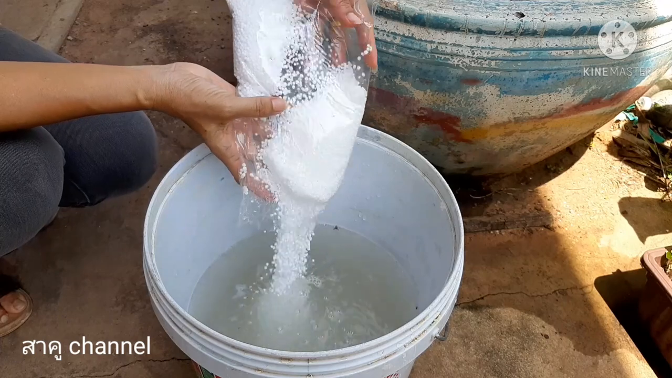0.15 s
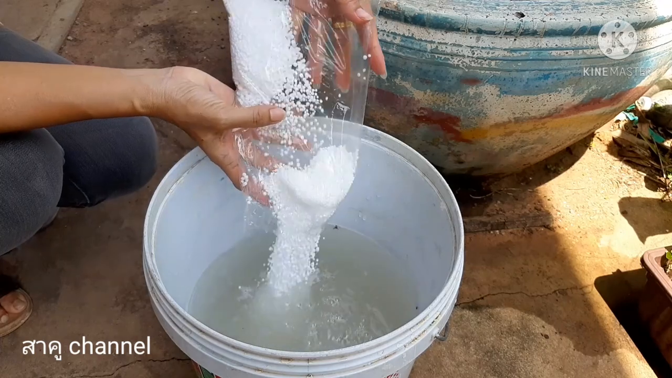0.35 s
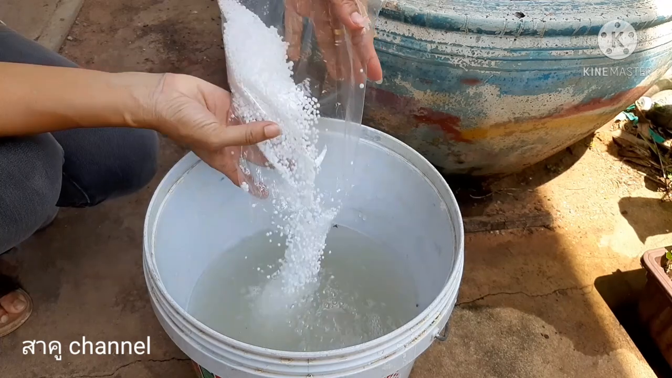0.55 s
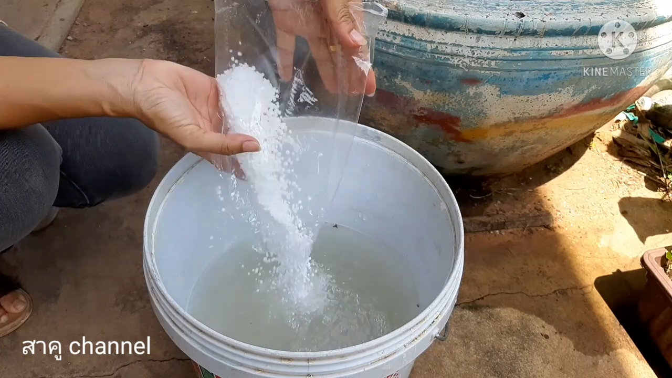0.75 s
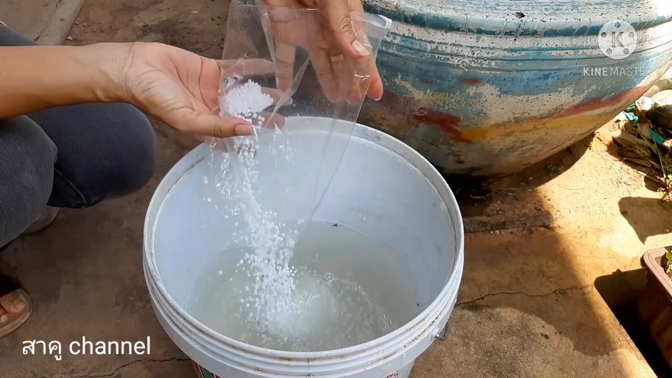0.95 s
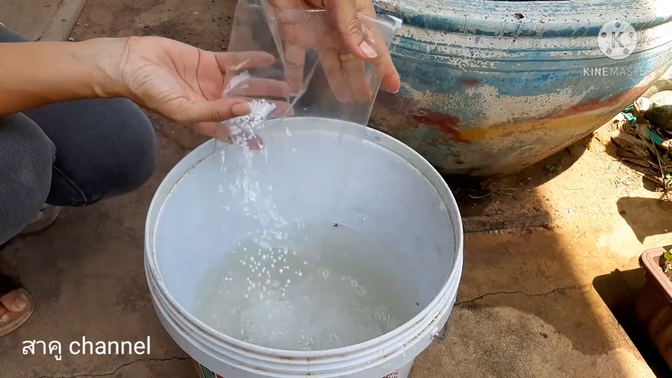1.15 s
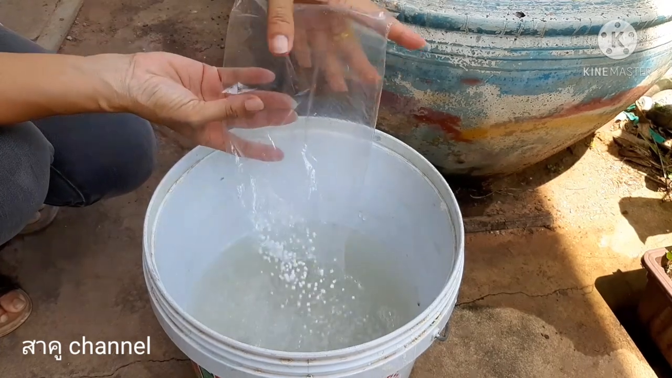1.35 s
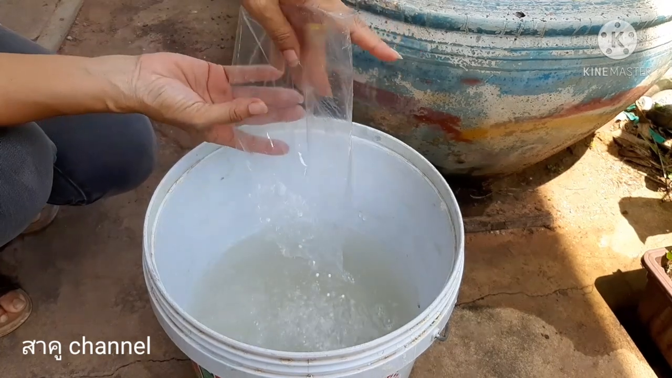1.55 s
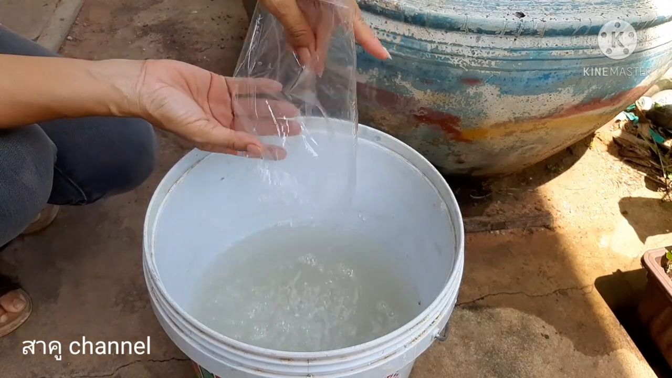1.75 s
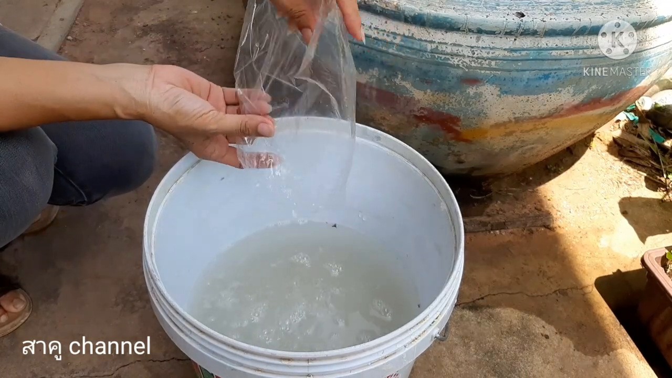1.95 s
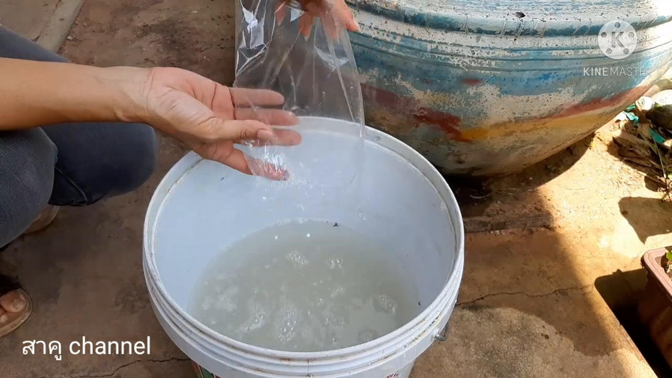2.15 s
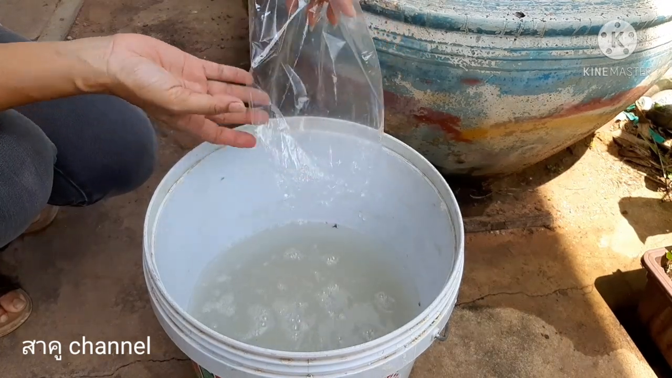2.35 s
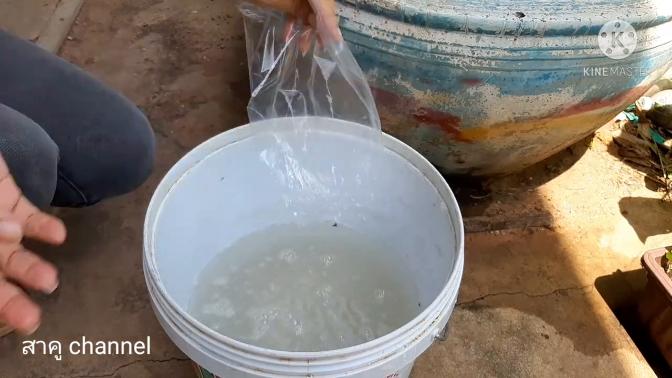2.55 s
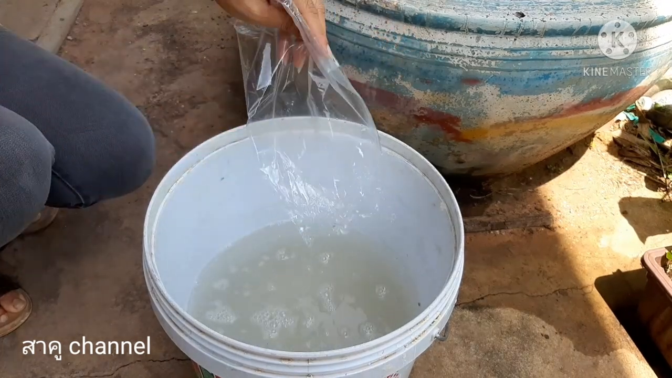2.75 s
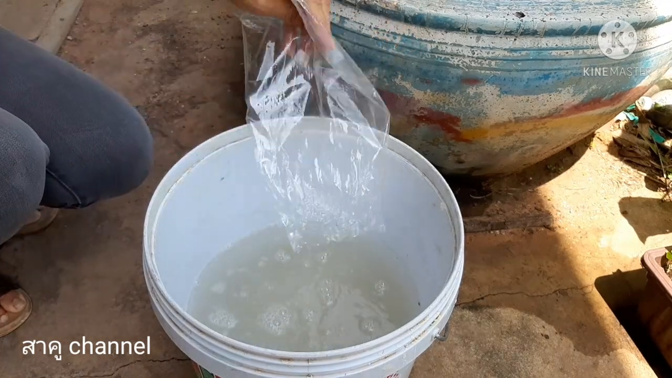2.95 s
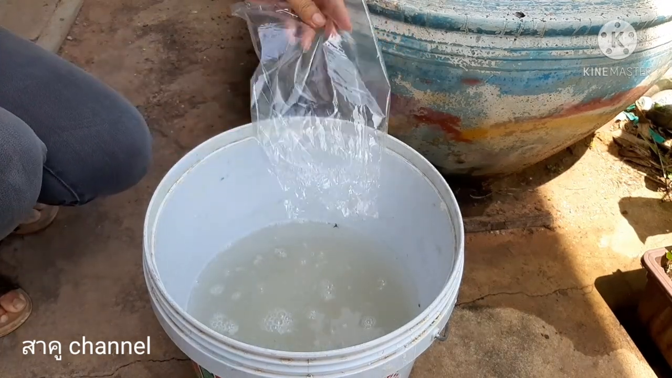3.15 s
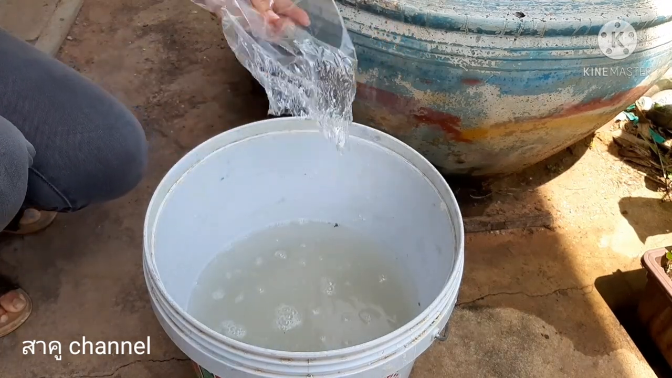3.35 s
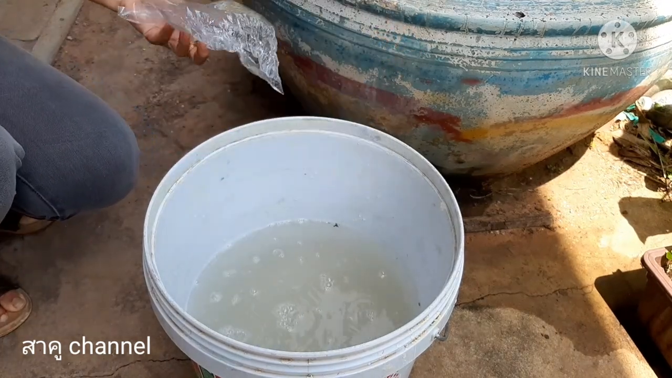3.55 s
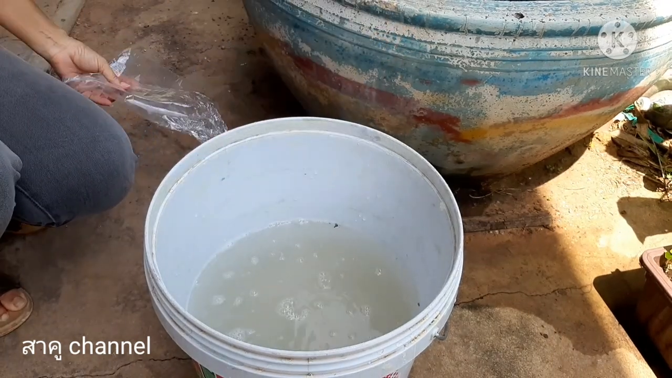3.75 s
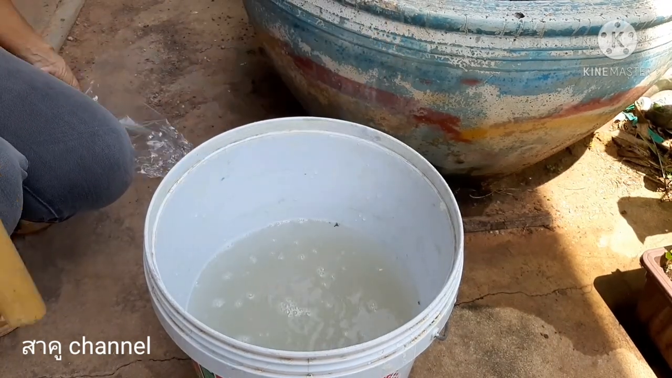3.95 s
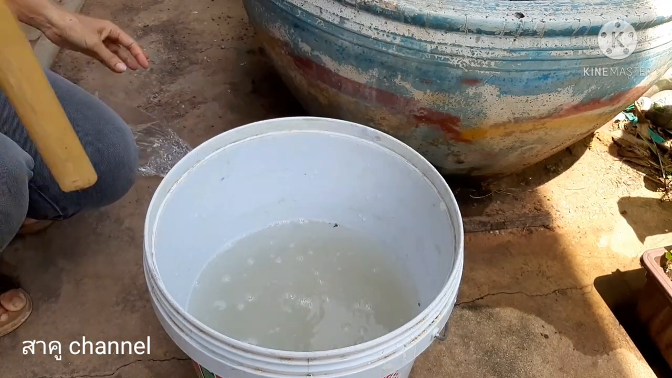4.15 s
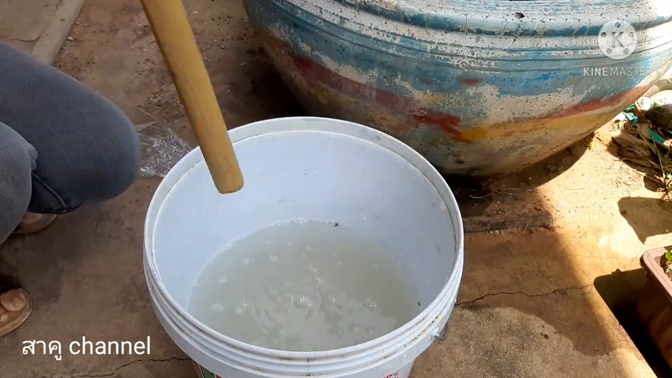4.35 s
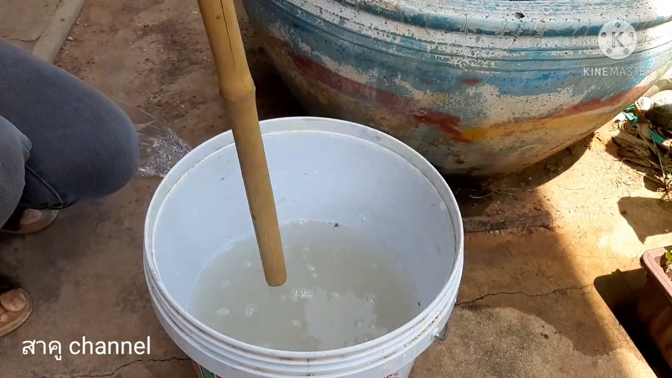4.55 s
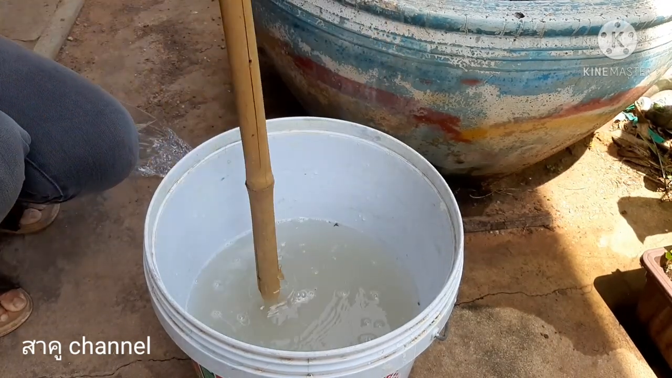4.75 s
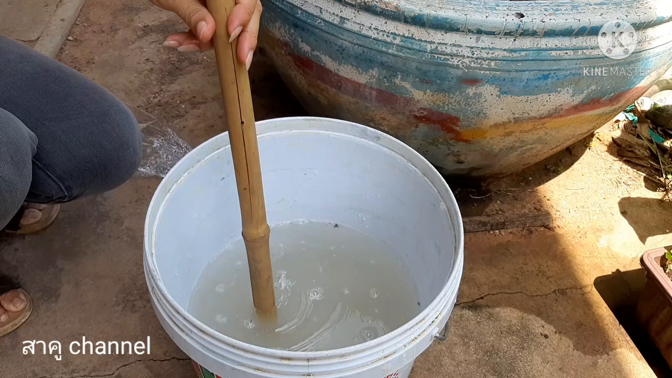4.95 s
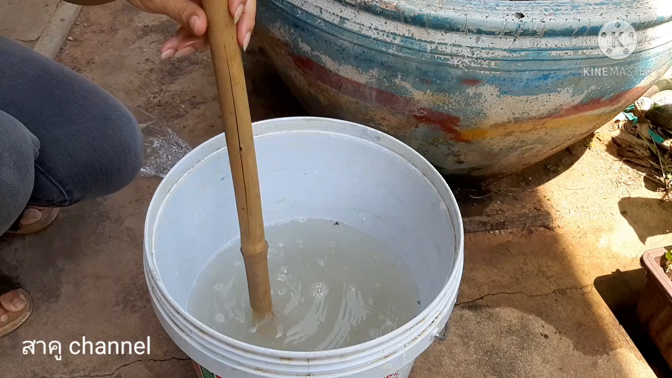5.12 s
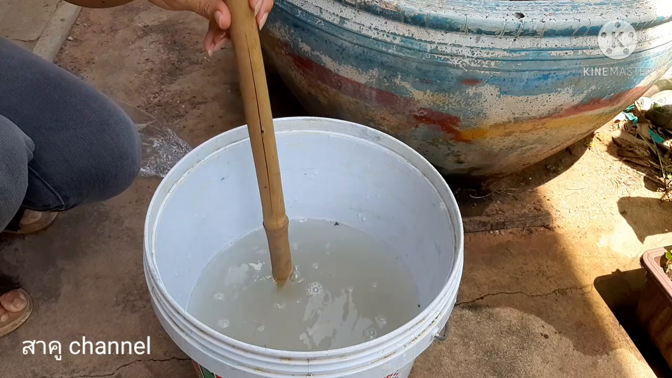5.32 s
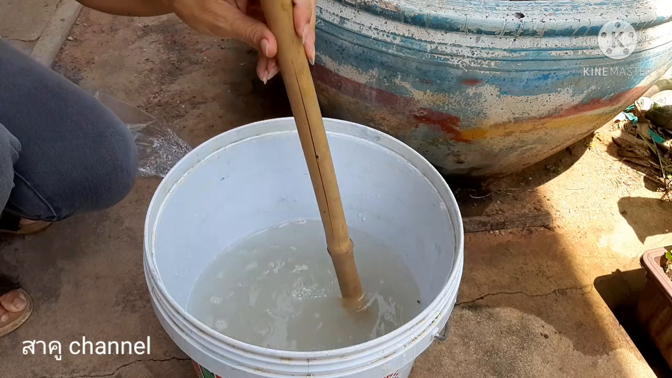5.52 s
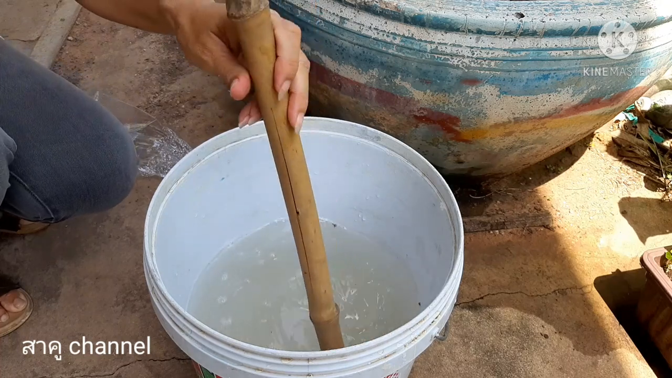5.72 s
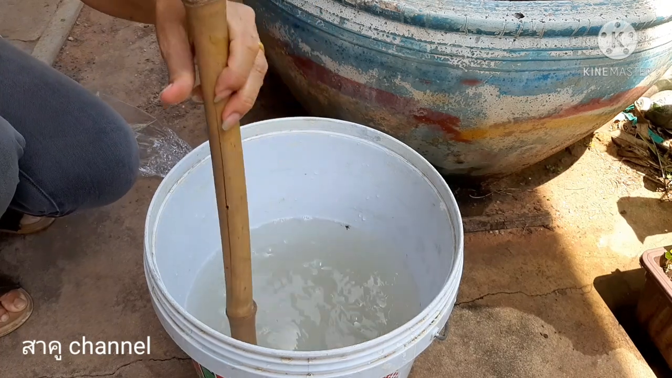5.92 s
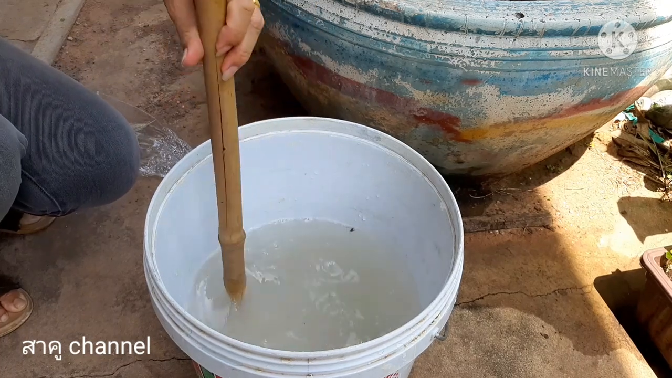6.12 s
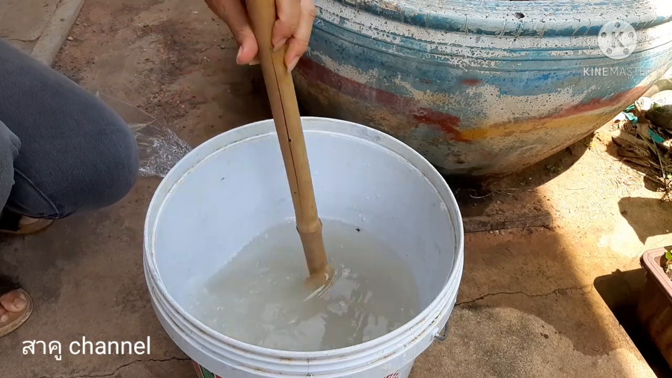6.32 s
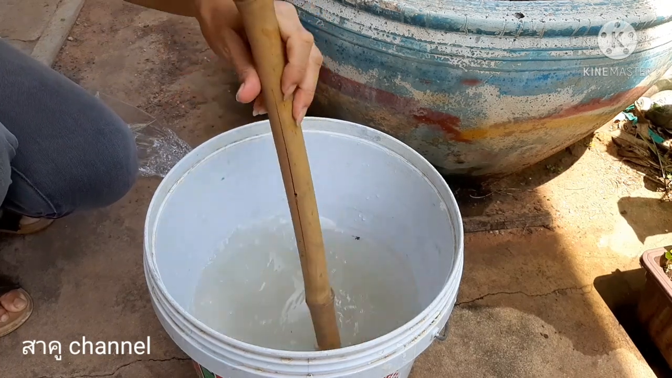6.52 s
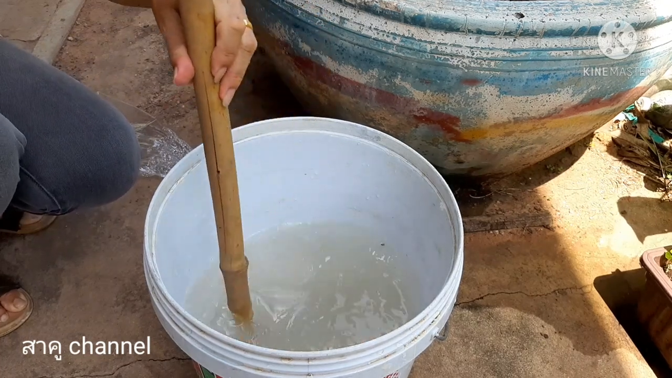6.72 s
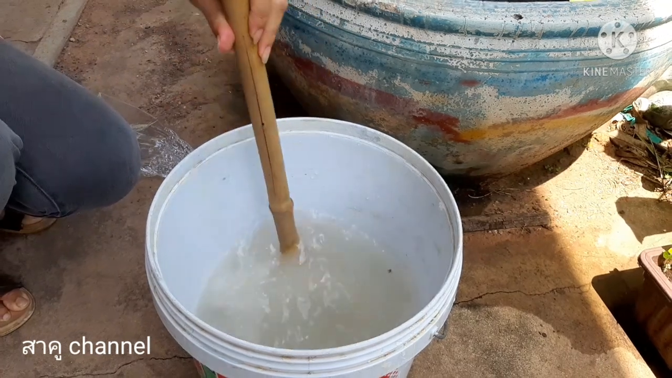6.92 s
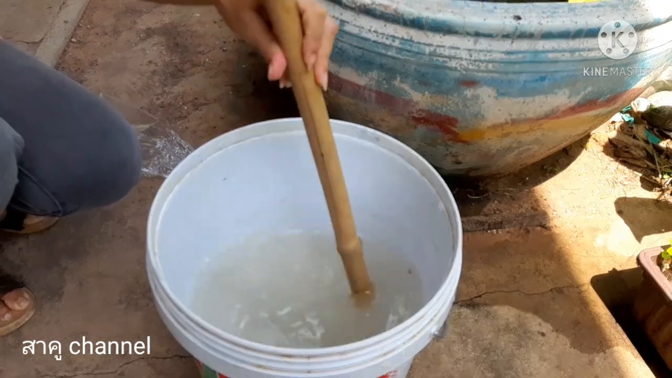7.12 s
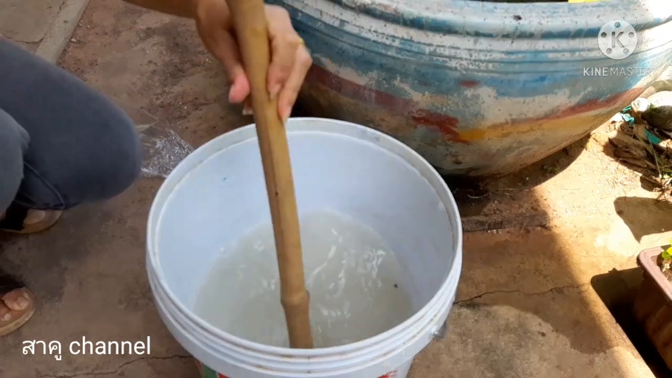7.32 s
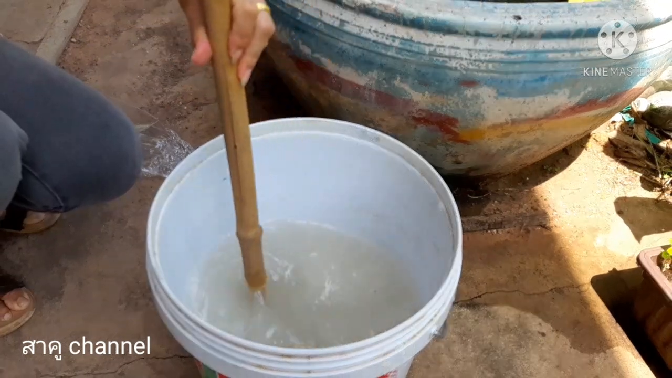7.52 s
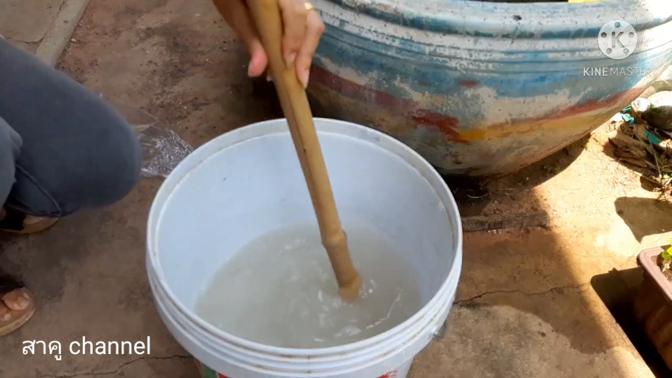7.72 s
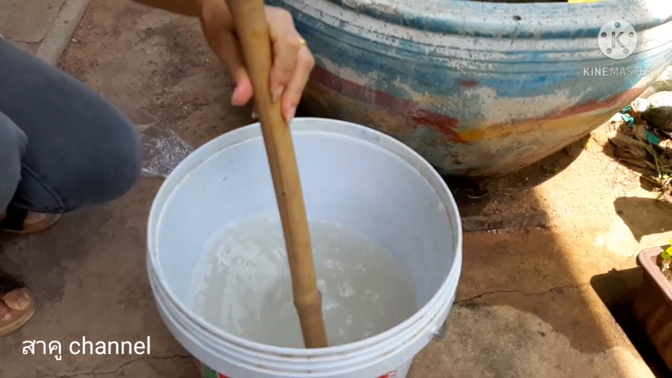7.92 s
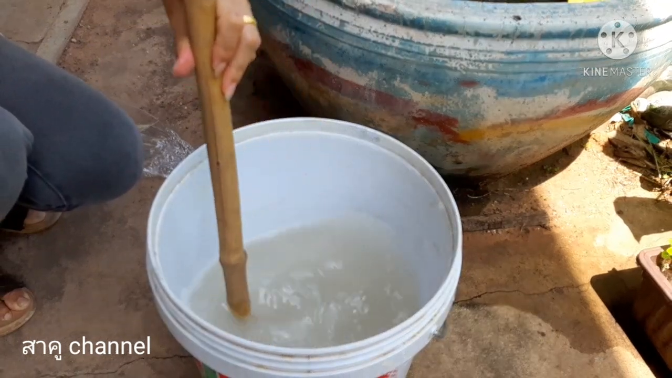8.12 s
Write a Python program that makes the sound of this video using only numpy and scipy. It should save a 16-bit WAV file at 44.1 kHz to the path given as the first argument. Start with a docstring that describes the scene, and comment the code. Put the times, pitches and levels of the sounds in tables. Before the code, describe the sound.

Thousands of tiny splashes ring inside a plastic bucket for under two seconds, with granules sliding over film. Crackles and sharp creases follow as the bag is emptied and put aside, while a faint rooster calls in the distance. A pole enters with a watery plop, then stirs with gritty scrapes, dull hollow knocks, crunches and bubbles. Close outdoor microphone, light hiss and low wind buffeting.

```python
"""Small hard granules slide out of a plastic bag and rain into a bucket of water, as noise made of many tiny ticks.
Yard hiss and light wind run throughout. The emptied bag is shaken and crumpled: crackling noise and sharp snaps.
A rooster crows far off, as a few gliding partials. A bamboo pole plops into the water, with ticks and rising
bubbles, while puffs of air thump on a pair of microphone ports. Then the pole grinds and bumps through the
granules on the bottom: noise ringing with the bucket, short knocks, bubbles and fizz."""
import sys
import numpy as np
from scipy import signal
from scipy.fft import rfft, irfft, next_fast_len
from scipy.io import wavfile
from scipy.ndimage import uniform_filter1d

SR = 44100
rng = np.random.default_rng(int(sys.argv[2]) if len(sys.argv) > 2 else 0)


def store_wav(level_fs):
    """Save 16-bit WAV to argv[1]."""
    pcm = np.round(np.clip(np.atleast_2d(level_fs), -1, 1) * 32767)
    wavfile.write(sys.argv[1], SR, pcm.T.astype(np.int16))


def voltage_ratio(level):
    """Linear amplitude factor for a level in decibels (scalar or array-like)."""
    return 10 ** (np.asarray(level, float) / 20)


N = 365138  # length in samples

# All table levels are relative: the functions add their own gains.
# Granules landing in the water: t/s, flow level/dB, clumping (0-1)
POUR_FLOW = [(0.0, -39.5, 0.8), (0.66, -42.5, 0.2), (0.79, -31.5, 0.33), (0.99, -37, 0.22), (1.2, -38, 0.5),
             (1.28, -36, 1), (1.38, -31.5, 0.82), (1.6, -55, 0), (1.75, -90, 0.1)]
# Tone of the tiny splashes: f/Hz, level/dB
SPLASH_TONE = [(71, -61), (120, -9.5), (333, -15), (733, 1.5), (844, -6), (1020, -7.5), (2000, 1),
               (8000, -10), (10400, -52)]
# Grain sizes in the spray: centre f/Hz, level/dB
SPRAY_SIZES = [(2300, -3.5), (3200, -0.5), (4300, -11)]
# Resonances of the bucket's air and walls: f/Hz, width/Hz, level above the rest/dB
BUCKET_RINGS = [(325.2, 21.7, 19.5), (372.7, 34, 16.5), (837, 23.7, 15), (1310, 30, 3.5), (1536, 32, 7.5),
                (2010, 42, 6.5), (4420, 1300, 6)]
# What the bucket floor radiates: f/Hz, level/dB
FLOOR_TONE = [(120, -32.5), (200, -3.5), (290, -8), (430, -5), (600, -8), (1500, -42.5)]
# Granules sliding over the film, then the bag moving in the hand: t/s, level/dB
BAG_SLIDE = [(0.0, -21.5), (0.61, -23.5), (0.95, -19), (1.2, -29), (1.4, -28), (1.6, -38), (2.3, -72),
             (2.63, -54.5), (3.45, -56), (4.35, -68)]
# Shakes and squeezes of the empty bag: peak t/s, level/dB, length/s
BAG_SHAKES = [(1.661, -28.5, 0.071), (1.78, -28, 0.034), (1.946, -27, 0.99), (2.13, -24.5, 0.37),
              (2.714, -37.5, 0.24), (2.8, -44.5, 0.54), (3.048, -40, 0.25), (3.188, -42.5, 0.17),
              (3.485, -44.5, 0.19), (3.751, -49.5, 0.59), (4.008, -36.5, 0.11), (4.035, -39.5, 0.25),
              (4.125, -39, 0.22)]
# Tone of the rustling plastic film: f/Hz, level/dB
FILM_TONE = [(120, -63), (200, -15), (328, -12.5), (519, 1), (722, -3), (2700, 3), (4000, 4), (5600, -0.5),
             (11100, -0.5), (14900, -3.5), (16000, -7)]
# Single creases snapping: t/s, level/dB, centre of the crack f/Hz
CREASE_SNAPS = [(1.649, -19.5, 7440), (1.725, -26, 7560), (1.7554, -22, 4550), (1.8506, -19.5, 4330),
                (1.948, -16, 3900), (2.0238, -19, 5920), (2.2722, -21.5, 9720), (2.284, -27, 7480),
                (2.2984, -33, 7670), (2.368, -27, 3940), (2.4017, -20, 7200), (2.4284, -24, 3020),
                (2.4494, -19.5, 4030), (2.5272, -24.5, 4800), (2.5915, -18, 4250), (2.7193, -28.5, 4370),
                (2.7644, -28.5, 3360), (2.796, -41, 5230), (2.839, -25, 6040), (2.8983, -24, 6940),
                (2.9402, -28.5, 3360), (2.9525, -30, 4530), (3.022, -26, 3990), (3.0364, -24.5, 3490),
                (3.0473, -25.5, 2970), (3.064, -21.5, 9960), (3.1488, -26, 2750), (3.1657, -25.5, 12500),
                (3.2234, -27.5, 4300), (3.2715, -30, 3630), (3.2936, -28, 4680), (3.338, -39, 3380),
                (3.53, -24, 2700), (3.5629, -18.5, 2850), (3.7453, -23.5, 5070), (3.9633, -30.5, 4450),
                (4.96, -20.5, 10400), (7.7846, -19.5, 3500)]
# Hiss of the yard: f/Hz, level/dB
YARD_TONE = [(150, -5), (400, 13), (1700, 4), (5000, 6), (8000, 0), (13000, 2), (15500, -4)]
# Strength of the wind: t/s, level/dB
WIND_LEVEL = [(0, -69), (1.6, -65.5), (2.1, -59), (2.6, -63.5), (3.85, -63.5), (4.15, -57), (4.85, -60),
              (5.05, -44.5), (5.3, -51.5), (6.6, -55), (7.6, -57), (8.28, -52)]
# Tone of the wind: f/Hz, level/dB
WIND_TONE = [(25, -53), (50, -6), (90, 1), (150, -8), (250, -19.5), (500, -33.5)]
# Low puffs of air on the ports: t/s, level/dB, f/Hz
AIR_PUFFS = [(4.928, -30, 103), (5.098, -19.5, 100), (5.381, -24, 112), (5.704, -26, 92),
             (5.991, -23, 89.5), (6.768, -23, 106), (7.127, -29, 87)]
# Likeness of the two ports: f/Hz, left-right likeness (0-1)
PORT_LIKENESS = [(60, 0.66), (300, 0.98), (700, 0.84), (1400, 0.65), (3000, 0.54), (6000, 0.023)]
# Crow, one list a phrase: t/s, middle pitch f/Hz, level/dB, second partial against the first level/dB,
# throat opening (0-1)
CROW_PHRASES = [
    [(3.35, 588, -56, -31, .1), (3.42, 612, -52, -1, 0), (3.52, 622, -44, -7, 0.3),
     (3.63, 624, -54, -13, .1)],
    [(3.64, 635, -76, -10, 0.5), (3.7, 686, -39.5, -6.5, 0.2), (3.9, 668, -39.5, -8.5, 0.24),
     (3.98, 664, -47, 4.5, 0.6), (4.08, 655, -44, -12, 0.1), (4.29, 640, -64, -1, 0.2)],
    [(4.28, 652, -63, 4, .1), (4.37, 658, -38.5, -11, 0.25), (4.47, 650, -41, -13, 0.72),
     (4.59, 630, -47.5, 2, 1), (4.68, 620, -36.5, -10, 0.3), (4.74, 603, -50.5, 3.5, 0.3),
     (4.93, 590, -49.5, -3.5, 0), (5.18, 543, -50, -4, 0.1)],
]
# Drips and plops as the pole goes in: t/s, tick level/dB, starting bubble f/Hz,
# bubble against tick level/dB, time for the bubble to fall 60 dB/s
POLE_PLOPS = [(4.53, -44, 2430, 13, 0.08), (4.554, -52.5, 1990, 15, 0.3), (4.69, -5, 440, -13.5, 0.026),
              (4.7572, -8, 589, -7.5, 0.073), (4.811, -47, 1098, 19, 0.15), (4.816, -42, 1000, 29.5, 0.011),
              (4.82, -49, 494, 22.5, 0.17)]
# Speed of the swirling water: t/s, level/dB
WATER_SWIRL = [(4.85, -79), (5.05, -77), (5.27, -60), (5.55, -43.5), (5.75, -39), (6.0, -36.5), (6.19, -42),
               (6.5, -37.5), (6.75, -36.5), (7.35, -41.5), (7.59, -37.5), (7.64, -32), (7.675, -40.5),
               (8.05, -41), (8.28, -39)]
# Pole scraping over the bottom: peak t/s, level/dB, length/s, weight on the floor level/dB
POLE_SCRAPES = [(5.204, -34.5, 0.11, 0), (5.321, -32.5, 0.28, 3), (5.423, -33, 0.34, 4),
                (5.66, -38.5, 1, -8.5), (6.25, -28, 0.24, -21), (6.338, -36.5, 0.53, 8),
                (6.567, -34.5, 1, -16), (6.772, -27, 0.19, -1), (6.955, -36.5, 0.32, -3.5),
                (7.133, -37.5, 0.62, -23), (7.427, -35, 0.023, -2), (7.638, -26.5, 0.14, -6),
                (7.87, -35.5, 0.48, -10), (8.276, -31.5, 0.09, 1)]
# Tone of the grinding granules: f/Hz, level/dB
GRIND_TONE = [(260, -15), (450, -18.5), (689, -5.5), (832, -11.5), (1150, -5.5), (1320, -1), (1640, -4),
              (2630, -11.5), (11000, -29)]
# Tone of the fizzing water: f/Hz, level/dB
FIZZ_TONE = [(880, -11), (1500, -3.5), (2060, 2.5), (5220, -2.5), (7320, -3.5), (11900, -6), (14900, -7.5),
             (16000, -8)]
# Pole bumping the bucket: t/s, level/dB, time to fall 60 dB as pole or water damps it/s,
# lower ring of the loaded floor f/Hz
POLE_BUMPS = [(5.206, -22, 0.096, 357), (5.352, -18.5, 0.13, 410), (5.447, 5.5, 0.022, 347),
              (6.236, -15, 0.15, 330), (6.288, 7, 0.022, 320), (6.349, -13.5, 0.071, 382),
              (6.687, -2.5, 0.056, 335), (6.744, -3, 0.034, 295), (6.771, -4, 0.057, 327),
              (6.971, -8, 0.049, 352), (7.43, -11, 0.04, 347), (7.609, -13.5, 0.052, 330),
              (7.649, 7, 0.02, 435), (7.714, -8.5, 0.036, 352), (7.891, 1.5, 0.076, 315),
              (8.185, -12, 0.031, 383)]
# Granules crunching under the pole: t/s, level/dB, centre f/Hz
GRANULE_CRUNCHES = [(5.315, -16, 800), (5.386, -12, 1270), (5.405, -14, 1240), (5.442, -12, 1250),
                    (5.745, -16.5, 1290), (6.247, -10.5, 835), (6.27, -11, 1340), (6.288, -10, 1310),
                    (6.33, -11.5, 910), (6.373, -15, 1210), (6.407, -19, 1390), (6.434, -5.5, 1340),
                    (6.46, -12.5, 1360), (6.54, -13.5, 1260), (6.638, -12, 1870), (6.682, -11.5, 853),
                    (6.765, -8.5, 1520), (7.104, -14.5, 747), (7.524, -18.5, 1780), (7.594, -19, 1480),
                    (7.628, -18, 925), (7.646, -10, 1296), (7.771, -24, 910), (7.821, -15.5, 1460),
                    (7.873, -17, 1540), (7.89, -16.5, 780), (8.185, -18.5, 1270), (8.264, -21, 1090)]

SPRAY_DB, SPRAY_PER_CLUMP_DB = 16, -29.5  # fine grains spray brightly, clumps less
THUD_DB, THUD_PER_CLUMP_DB = -19.5, 15  # clumps shake the bucket floor
SHAKE_RISE, SCRAPE_RISE = 0.36, 0.42  # share of a gesture's length spent rising
GESTURE_EDGE_DB = -29  # level at both ends of a gesture, against its peak
YARD_DB = -59.5
PUFF_S, PUFF_LEFT = 0.028, 0.099  # length of a puff; its share at the sheltered left port
PORT_TILT_DB, LEFT_EARLY = 1.0, 4.0  # left raised and right lowered by this; left earlier (samples)
THIRD_DB, THIRD_OPEN_DB = -25, 17  # third partial with the throat shut; gain when open
FOURTH_DB, FOURTH_OPEN_DB = -34, 32  # the same for the fourth
SWIRL_GRIND_DB, SWIRL_HUM_DB, SCRAPE_FIZZ_DB = -5.5, -33, -13  # shares of swirl and scrape
BUMP_RISE_S = 0.0079  # soft start of a bump
TOP_HZ = 15750  # upper edge of the finished mix


def evened(x):
    """Scales to an rms of 1."""
    return x / np.sqrt(np.mean(x ** 2) + 1e-20)


def read(points, hz):
    """Reads a spectrum table at the frequencies hz, along a log frequency scale."""
    f, value = np.transpose(points)
    return np.interp(np.log(hz + 1), np.log(f + 1), value)


def level(rows):
    """Turns the dB column of a curve into gain per sample, silent outside."""
    rows = np.array(rows)
    return voltage_ratio(np.interp(np.arange(N) / SR, rows[:, 0], rows[:, 1], left=-200, right=-200))


def add(mix, s, sound):
    """Mixes a sound in at s seconds."""
    part = mix[..., round(s * SR):][..., :sound.shape[-1]]
    part += sound[..., :part.shape[-1]]


def colour(x, points, ring=0., band=(20, 16000)):
    """Filters by a spectrum plus a share of the bucket's resonances; rms gain 1 inside the band."""
    hz = np.fft.rfftfreq(8192, 1 / SR)
    peaks = sum((voltage_ratio(db) ** 2 - 1) / (1 + (2 * (hz - f) / w) ** 2) for f, w, db in BUCKET_RINGS)
    gain = voltage_ratio(read(points, hz) + ring * 10 * np.log10(1 + peaks))
    gain /= np.sqrt(np.mean(gain ** 2 * (hz > band[0]) * (hz < band[1])))
    # minimum phase: the filter answers at once and never ahead of the sound
    circle = np.log(np.r_[gain, gain[-2:0:-1]])
    taps = np.fft.ifft(np.exp(np.conj(signal.hilbert(circle)))).real[:4096]
    return signal.oaconvolve(x, taps[None], axes=1)[:, :N]


def random_ticks(per_s, spread_db):
    """Ticks at random moments, of very unequal size."""
    sizes = voltage_ratio(spread_db * np.minimum(rng.exponential(1, N), 3))
    return sizes * (rng.random(N) < per_s / SR)


def grains(per_s, spread_db, t60):
    """Envelope of random ticks, each falling 60 dB in t60 seconds; rms 1."""
    fade = voltage_ratio(-120 / (t60 * SR))  # per sample, for power
    power = signal.lfilter([1], [1, -fade], random_ticks(per_s, spread_db) ** 2)
    return evened(np.sqrt(power))


def hiss(envelope):
    """Two unrelated noises under one envelope: what both ports share, and what differs."""
    return envelope * rng.standard_normal((2, N))


def smooth_noise(count, size):
    """Slow random drift, rms 1; a larger size (samples) drifts more slowly."""
    return evened(uniform_filter1d(rng.standard_normal(count), size=size))


def burst(t, hz, width):
    """Noise gathered round a centre; width is a share of the centre."""
    r = np.exp(-np.pi * width * hz / SR)
    poles = [1, -2 * r * np.cos(2 * np.pi * hz / SR), r * r]
    sections = [[1, 0.0081, -1.003, *poles], [1, 0.017, -0.59, *poles]]
    return evened(signal.sosfilt(sections, rng.standard_normal((2, len(t)))))


def gurgles(per_s, count=24):
    """Short rising bubbles of many sizes, each size at its own random moments; rms 1."""
    t, out = np.arange(1500) / SR, np.zeros((2, N))
    for hz in np.geomspace(780, 3200, count):
        starts = random_ticks(per_s / count, spread_db=3.6)
        envelope = np.exp(-t * hz / 5.5) * (1 - np.exp(-t * hz))
        bubble = np.sin(2 * np.pi * hz * t * (1 + 1.5 * t)) * envelope
        out += signal.oaconvolve(starts, bubble)[:N] * [[1], [rng.choice([-1, 1])]]
    return evened(out)


def gestures(rows, rise):
    """Each gesture swells to its peak and falls away; their powers add."""
    t, power = np.arange(0, N + 64, 64) / SR, 0
    for s, db, length in rows:
        away = np.where(t < s, (s - t) / rise, (t - s) / (1 - rise)) / length
        power = power + voltage_ratio(db + GESTURE_EDGE_DB * away) ** 2
    return np.interp(np.arange(N) / SR, t, np.sqrt(power))


def pour():
    """Thousands of tiny splashes a second excite the bucket; clumps shake its floor."""
    t = np.arange(N) / SR
    s, _, clump = np.transpose(POUR_FLOW)
    clump = np.interp(t, s, clump)
    flow = level(POUR_FLOW)
    splashes = flow * grains(per_s=2500, spread_db=4.0, t60=0.006)
    out = colour(hiss(splashes), SPLASH_TONE, ring=1.28, band=(600, 1800))
    thuds = voltage_ratio(THUD_DB + THUD_PER_CLUMP_DB * clump) * splashes
    out += colour(hiss(thuds), FLOOR_TONE, ring=0.76, band=(260, 480))
    # bubbles set the bucket ringing
    out += colour(voltage_ratio(-7) * flow * gurgles(per_s=2600), SPLASH_TONE, ring=1.0, band=(600, 1800))
    spray = voltage_ratio(SPRAY_DB + SPRAY_PER_CLUMP_DB * clump) * splashes
    for hz, db in SPRAY_SIZES:  # each size comes and goes by itself
        drift = smooth_noise(N, 2500)
        out += spray * voltage_ratio(db + 5.0 * drift) * burst(t, hz, width=0.39)
    return out


def bag():
    """Sliding granules hiss; the emptied film crackles, dull or bright; clear creases snap by themselves."""
    # share of crackle: it grows as the bag empties; laid on the ground, the bag slides
    crackle = np.interp(np.arange(N) / SR, [1.1, 2.3, 3.8, 3.95], [.1, .75, .75, .1])
    rustle = np.hypot(level(BAG_SLIDE), gestures(BAG_SHAKES, SHAKE_RISE))
    sliding = rustle * np.sqrt(1 - crackle) * grains(per_s=6300, spread_db=-2.5, t60=0.018)
    out = colour(hiss(sliding), FILM_TONE, ring=0.3, band=(5000, 15000))
    crumple = rustle * np.sqrt(crackle)
    high = crumple * grains(per_s=220, spread_db=4.0, t60=.008)
    top = crumple * grains(per_s=220, spread_db=4.0, t60=.008)
    low = voltage_ratio(-5.0) * crumple * grains(per_s=140, spread_db=4.0, t60=.022)
    t = np.arange(3000) / SR
    # crack, a few ms of tearing that stops short, a faint tail from the ground
    shape = 0.6 * voltage_ratio(-60 * t / 0.006) + 0.45 * np.exp(-(t / 0.007) ** 2) + 0.08 * voltage_ratio(-60 * t / 0.12)
    for s, db, hz in CREASE_SNAPS:
        ragged = shape * voltage_ratio(db + 2.5 * smooth_noise(len(t), 30))
        add(out, s, 0.5 * ragged * burst(t, hz, width=0.6))
        add(top, s, 0.36 * ragged)
        add(low, s, 0.22 * ragged * (3000 / hz) ** 0.79)  # large creases are duller
    out += colour(hiss(high), [(1500, -36), (3200, 8.5), (7000, 9.5), (15000, -33.0)], band=(3000, 15000))
    out += colour(hiss(top), [(3000, -5), (7500, 2.5), (15000, 0.5)], band=(3000, 15000))
    low_tone = [(300, -17), (2500, 0.0), (4500, 0.0), (9000, -48)]
    return out + colour(hiss(low), low_tone, ring=0.5, band=(700, 3000))


def outdoors():
    """The quiet hiss of the yard is steady coloured noise."""
    return colour(hiss(voltage_ratio(YARD_DB)), YARD_TONE, band=(2800, 16000))


def wind():
    """Lumpy low turbulence, unrelated at the two ports; sharper puffs thump."""
    t = np.arange(4000) / SR
    lumps = np.hypot(.8, 1.63 * grains(per_s=41, spread_db=2.5, t60=0.18))
    out = colour(hiss(level(WIND_LEVEL) * lumps), WIND_TONE, band=(40, 170))
    swell = np.sin(np.pi * np.minimum(t / PUFF_S, 1)) ** 2
    for s, db, hz in AIR_PUFFS:
        puff = voltage_ratio(db) * np.sin(2 * np.pi * hz * t) * swell
        add(out, s, puff * [[PUFF_LEFT], [1]])
    return out


def rooster():
    """Hoarse partials on a gliding pitch, beating with their far echoes."""
    out = np.zeros((2, N))
    for rows in CROW_PHRASES:
        s, *columns = np.transpose(rows)
        t = np.arange(s[0], s[-1], 1 / SR)
        hz, db, second_db, opening = (np.interp(t, s, c) for c in columns)
        third_db = db + THIRD_DB + THIRD_OPEN_DB * opening
        fourth_db = db + FOURTH_DB + FOURTH_OPEN_DB * opening
        flutter = .011 * smooth_noise(len(t), 400)
        waver = .004 * smooth_noise(len(t), 3000)
        turns = np.cumsum(hz * (1 + flutter + waver)) / SR
        for k, part_db in enumerate([db, db + second_db, third_db, fourth_db], 1):
            noise = rng.standard_normal((2, len(t)))
            a, b = evened(uniform_filter1d(uniform_filter1d(noise, 350), 350))
            echoes = (.28 + .12 * k) * (a + 1j * b)  # upper partials arrive more scattered
            tone = voltage_ratio(part_db) * ((1 + echoes) * np.exp(2j * np.pi * k * turns)).real
            add(out[0], s[0], tone * signal.windows.tukey(len(t), .1))
    return out


def plops():
    """A bright tick together with a bubble whose pitch rises a little, in a short splash."""
    t, tick, out = np.arange(5000) / SR, np.zeros(N), np.zeros((2, N))
    tick_shape = 0.2 * voltage_ratio(-60 * t / 0.0096) + 0.017 * voltage_ratio(-60 * t / 0.21)
    for s, db, hz, bubble_db, t60 in POLE_PLOPS:
        add(tick, s, voltage_ratio(db) * tick_shape)
        bubble = 0.6 * np.sin(2 * np.pi * hz * t * (1 + 0.59 * t)) * [[1], [0]]
        splash = 0.21 * burst(t, hz, width=0.64)
        envelope = voltage_ratio(db + bubble_db - 60 * t / t60) * (1 - np.exp(-t / 0.00039))
        add(out, s, envelope * (bubble + splash))
    tick_tone = [(600, 21), (1200, 12.0), (2500, 15.0), (3500, 19.4), (7500, 17.0), (15000, 3.2)]
    return out + colour(hiss(tick), tick_tone, band=(2000, 15000))


def stir():
    """The pole grinds through the bucket's resonances and traps bubbles, the floor hums, the water fizzes."""
    swirl = level(WATER_SWIRL)
    scrape = gestures([row[:3] for row in POLE_SCRAPES], SCRAPE_RISE)
    weighted = [(s, db + weight_db, length) for s, db, length, weight_db in POLE_SCRAPES]
    grind = np.hypot(voltage_ratio(SWIRL_GRIND_DB) * swirl, scrape)
    hum = np.hypot(voltage_ratio(SWIRL_HUM_DB) * swirl, gestures(weighted, SCRAPE_RISE))
    fizz = np.hypot(swirl, voltage_ratio(SCRAPE_FIZZ_DB) * scrape)
    slips = np.hypot(.6, 1.11 * grains(per_s=110, spread_db=-0.5, t60=0.096))
    out = colour(hiss(voltage_ratio(-0.13) * grind * slips), GRIND_TONE, ring=1.0, band=(700, 2800))
    out += voltage_ratio(-1) * grind * gurgles(per_s=350)
    out += colour(hiss(hum * slips), FLOOR_TONE, ring=0.97, band=(260, 450))
    sparkle = fizz * grains(per_s=900, spread_db=7.0, t60=0.29)
    return out + colour(hiss(sparkle), FIZZ_TONE, band=(5000, 15000))


def bumps():
    """The pole rings the bucket floor at two pitches with a soft start."""
    t, out = np.arange(6000) / SR, np.zeros((2, N))
    ratio = BUCKET_RINGS[1][0] / BUCKET_RINGS[0][0]  # upper pitch against lower
    start = 1 - np.exp(-(t / BUMP_RISE_S) ** 2)
    for s, db, t60, hz in POLE_BUMPS:
        turns = 2 * np.pi * hz * t
        pair = np.sin(turns) + 0.29 * np.sin(ratio * turns)
        add(out[0], s, pair * voltage_ratio(db - 60 * t / t60) * start)  # shared by both ports
    return out


def crunches():
    """Crushed granules give short rings in a burst of noise."""
    t, out = np.arange(6000) / SR, np.zeros((2, N))
    start = 1 - np.exp(-(t / 0.0021) ** 2)
    for s, db, hz in GRANULE_CRUNCHES:
        noise = 0.34 * burst(t, hz, width=1.05) + 0.28 * burst(t, hz, width=0.28)
        ring = 0.3 * np.sin(2 * np.pi * hz * t)
        add(out, s, (noise + ring) * voltage_ratio(db + 4.5 - 60 * t / 0.04) * start)
    return out


def ports(pair):
    """Bass reaches both ports alike, treble arrives by different paths."""
    size = next_fast_len(N)
    hz = np.fft.rfftfreq(size, 1 / SR)
    same = read(PORT_LIKENESS, hz)
    shared, other = rfft(pair, size)
    left = same * shared + np.sqrt(1 - same ** 2) * other
    left = left * np.exp(2j * np.pi * hz * LEFT_EARLY / SR)  # a turn of phase moves it earlier
    return irfft(np.array([left * voltage_ratio(PORT_TILT_DB), shared / voltage_ratio(PORT_TILT_DB)]), size)[:, :N]


def scene():
    """Sounds from around reach the two ports; the wind acts on each port by itself."""
    return ports(pour() + bag() + outdoors() + rooster() + plops() + stir() + bumps() + crunches()) + wind()


def band_limit(x):
    """A steep low-pass at the top of the band."""
    return signal.sosfilt(signal.butter(12, 16680, fs=SR, output="sos"), x)


def record(dry):
    """Takes away the highest treble with a steep filter and finishes the mix."""
    edge = signal.firwin(255, TOP_HZ, window=("kaiser", 6), fs=SR)
    mix = signal.oaconvolve(dry, edge[None], "same", axes=1)
    return band_limit(mix)


dry = scene()
out = record(dry)
store_wav(out)
```